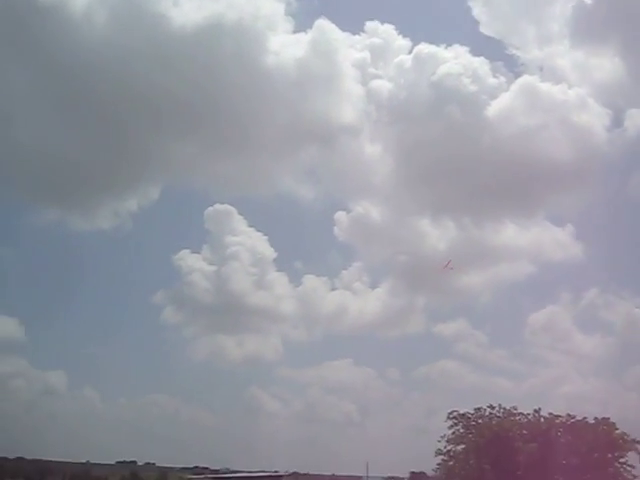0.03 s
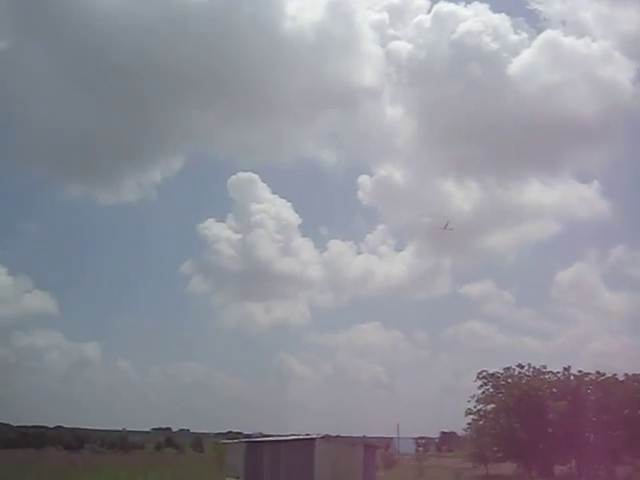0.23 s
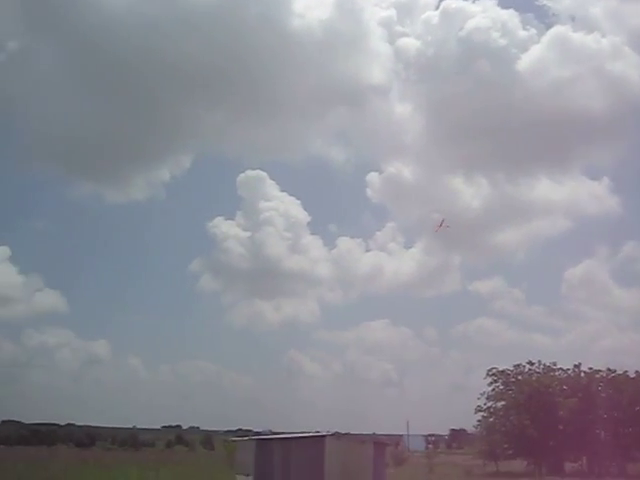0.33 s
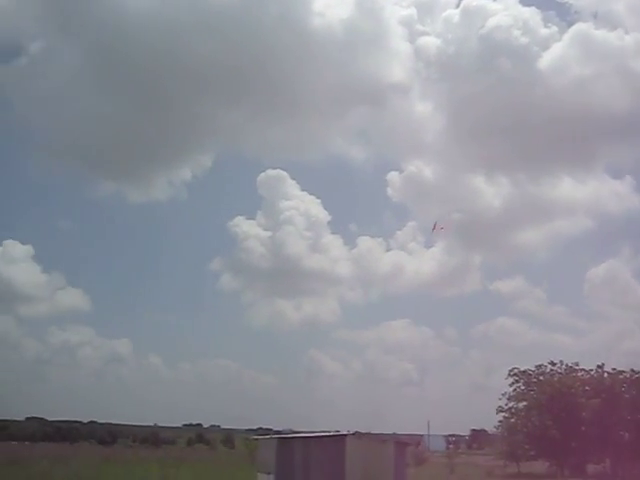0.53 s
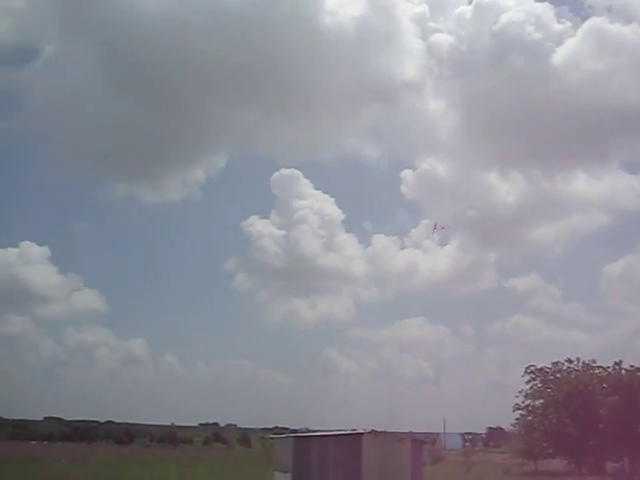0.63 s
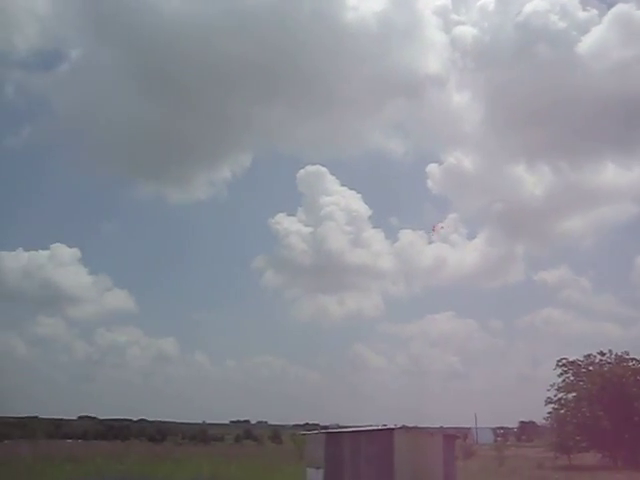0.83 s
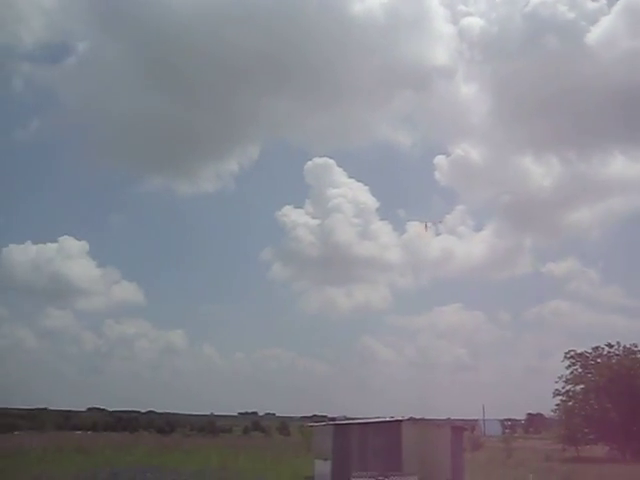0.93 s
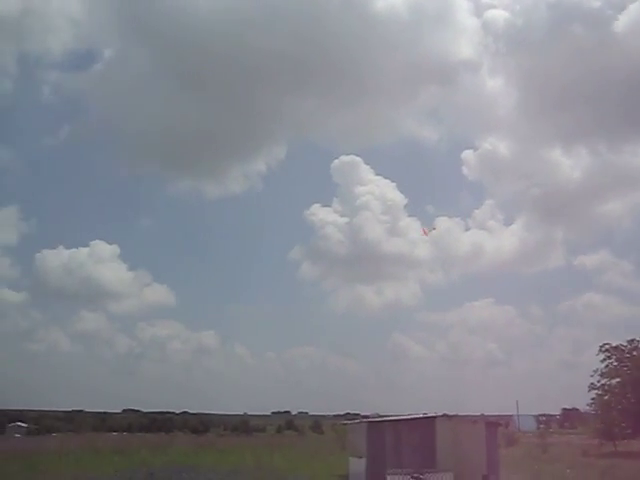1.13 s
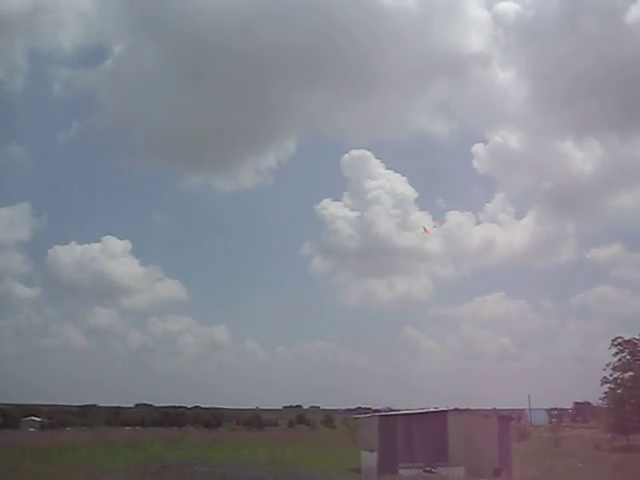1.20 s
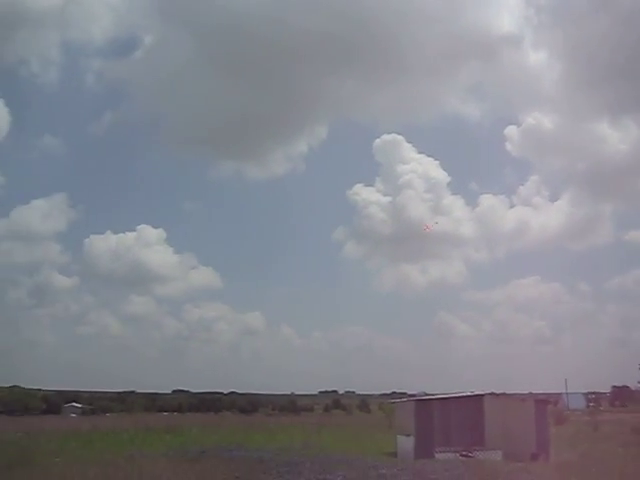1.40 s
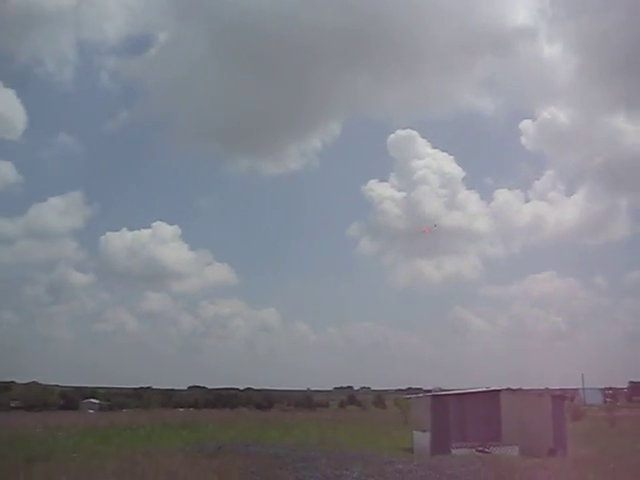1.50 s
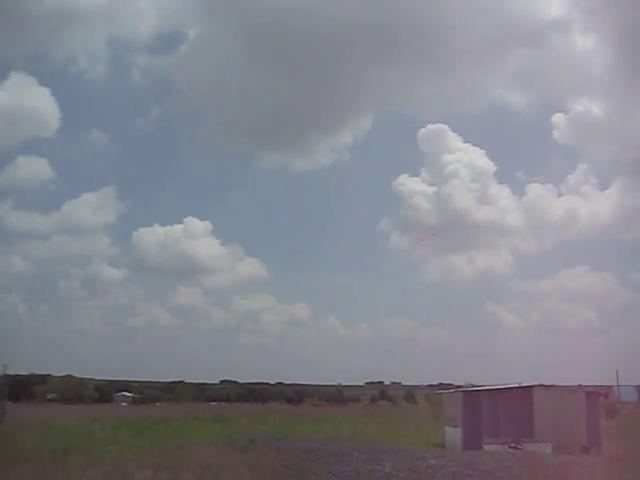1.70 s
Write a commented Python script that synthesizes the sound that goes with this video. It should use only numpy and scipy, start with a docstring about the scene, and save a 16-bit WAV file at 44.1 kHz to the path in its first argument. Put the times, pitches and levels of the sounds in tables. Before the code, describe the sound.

Repeated buzzy bird chirps over wind buffeting, a faint insect rasp and hiss.

```python
"""Songbird in a windy field

A songbird gives six buzzy trills that end in an upward flick, then two clear slurs (sliding notes),
each followed by a pip. An insect scrapes its file of tiny teeth in the grass and fades. Eddies, small
swirls of wind, thump on the microphone, over a steady hiss and a thin electronic whine."""
import sys
import numpy as np
from scipy import signal
from scipy.fft import rfft, irfft
from scipy.io import wavfile
from scipy.ndimage import uniform_filter1d

SR = 44100
rng = np.random.default_rng(int(sys.argv[2]) if len(sys.argv) > 2 else 0)


def dump(signal):
    """Clip the signal to [-1, 1] and save it as 16-bit WAV at the path in sys.argv[1]."""
    limited = np.clip(np.atleast_2d(signal).T, -1, 1)
    pcm = np.round(limited * 32767).astype(np.int16)
    wavfile.write(sys.argv[1], SR, pcm)


N = 77175
T = np.arange(N) / SR


def from_db(db):
    """Turn decibels into a number to multiply by."""
    return 10 ** (np.asarray(db) / 20)


def unit_power(x):
    """Scale a signal to an average power of 1."""
    return x / np.sqrt(np.mean(x ** 2) + 1e-20)


def colour(x, spectrum):
    """Shape the lows and highs with (f/Hz, level/dB) points, then scale to a power of 1."""
    hz, db = np.transpose(spectrum)
    f = np.arange(N // 2 + 1) * SR / N
    gain = from_db(np.interp(np.log(f + 1), np.log(hz), db))
    return unit_power(irfft(rfft(x) * gain, N))


def drift(per_s):
    """A random wander around zero that heads for a new value per_s times a second."""
    points = rng.standard_normal(2000)
    return np.interp(T * per_s, np.arange(len(points)), points)


def bell_curve(x):
    """A smooth bump, highest at x = 0."""
    return np.exp(-.5 * x ** 2)


def hiss():
    """Steady noise, strongest in the bass."""
    # tone of the hiss: f/Hz, level/dB
    spectrum = [(30, 15), (150, 4.5), (400, 5.5), (1000, 1.5), (1700, 0), (3000, -3), (5000, -6.5),
                (7600, -9), (8500, -9), (10000, -10), (11500, -14), (14000, -18), (15800, -11),
                (16400, -57)]
    return from_db(-45) * colour(rng.standard_normal(N), spectrum)


def rustles():
    """Short, soft puffs of noise."""
    # one row per rustle: t/s, width/s, centre f/Hz, level/dB
    puffs = [(0.047, 0.013, 1070, -45), (0.048, 0.0035, 1800, -42), (1.45, 0.015, 5400, -53.5)]
    out = np.zeros(N)
    for t, width, hz, db in puffs:
        band = colour(rng.standard_normal(N), [(hz / 2, -30), (hz, 0), (hz * 2, -30), (hz * 3, -60)])
        out += from_db(db) * band * bell_curve((T - t) / width)
    return out


def electronic_whine(hz=7570, restarts_per_s=30):
    """The electronics add a thin tone and its octave, which keep restarting."""
    phase = 2 * np.pi * hz * (T % (1 / restarts_per_s))
    return np.sqrt(2) * (from_db(-54.5) * np.sin(phase) + from_db(-58) * np.sin(2 * phase))


def insect(first_chirp_s=.02634, stroke_gap_s=.0072, stroke_width_s=.0017, teeth_per_s=4500):
    """Each chirp is three strokes of a file whose tiny teeth click."""
    # course of the chirping: t/s, chirp rate/Hz, level/dB
    chirping = [(0, 30, -47), (.05, 34, -44), (.13, 33.3, -39.5), (.28, 32, -41.5), (.55, 33.1, -44),
                (.75, 35, -45), (.83, 35, -52), (1.2, 28, -54.5), (1.75, 24, -54)]
    # tone of the rasp: f/Hz, level/dB
    rasp = [(2500, 0), (3300, 2), (4500, -0.5), (6500, 0.5), (7700, -0.5), (8500, 5.5), (10000, 1),
            (12000, -6.5), (16500, -9)]
    t, rates, db = np.transpose(chirping)
    rate = np.interp(T, t, rates)
    chirp_count = np.cumsum(rate) / SR - first_chirp_s * rate[0]
    strokes = np.zeros(N)
    for k in range(3):
        from_stroke_s = ((chirp_count - k * stroke_gap_s * rate + .5) % 1 - .5) / rate
        strokes += bell_curve(from_stroke_s / stroke_width_s)
    clicks = rng.choice([-1, 1], N) * (rng.random(N) < teeth_per_s / SR)
    return colour(clicks, rasp) * strokes * from_db(np.interp(T, t, db) + 1.7 * drift(140))


def pressure_pulses(eddies, edge_db, edge_ratio=1.85, width_cycles=.37):
    """Each eddy (t/s, level/dB, f/Hz) hits the microphone as a swing of pressure with a steeper edge."""
    out = np.zeros(N)
    for (t, db, hz), phase in zip(eddies, rng.uniform(0, 2 * np.pi, len(eddies))):
        near = slice(max(int(t * SR) - 1500, 0), max(int(t * SR) + 1500, 0))
        for part_hz, part_db in ((hz, db), (hz * edge_ratio, db + edge_db)):
            cycles = (T[near] - t) * part_hz
            swing = np.cos(2 * np.pi * cycles + phase)
            out[near] += from_db(part_db) * bell_curve(cycles / width_cycles) * swing
    return out


def wind(eddies_per_s=140, eddy_hz=168.3, octaves_per_db=.032, top_hz=1056):
    """Eddies pop louder and higher as the gust grows, over a rumble; some hit hard."""
    # wind strength at the microphone: t/s, level/dB
    gusts = [(0, -56), (.12, -42.5), (.21, -34.5), (.29, -29), (.48, -23), (.54, -28.5), (.66, -27),
             (.79, -28), (.88, -24), (.96, -33), (1.02, -22), (1.07, -38.5), (1.12, -38.5), (1.17, -23.5),
             (1.27, -40.5), (1.34, -26), (1.44, -33), (1.52, -36), (1.60, -50), (1.75, -88)]
    # tone of the rumble: f/Hz, level/dB
    rumble_tone = [(20, -16), (45, 1), (90, 0.5), (150, 0.5), (300, -24), (900, -33)]
    # hard hits of air: t/s, level/dB, f/Hz
    hits = [(.245, -20.5, 352), (0.248, -18.5, 520), (.285, -12.5, 306), (.298, -15, 200), (.371, -16, 178),
            (.433, -15.5, 244), (0.466, -16, 190), (0.479, -12.5, 303), (.494, -19.5, 234),
            (0.599, -18, 334.5), (0.613, -16.5, 196.7), (0.641, -13, 167), (0.697, -11, 229),
            (.747, -12.5, 348), (.755, -14, 132), (.788, -22.5, 340), (.844, -16.5, 410),
            (0.852, -10.5, 290), (.856, -9.5, 282), (.880, -10, 330), (0.885, -9, 268), (.901, -15.5, 195),
            (1.004, -7, 398), (1.006, -16.5, 472), (1.101, -21.5, 127), (1.102, -10, 460),
            (1.164, -18, 398), (1.180, -18, 240.5), (1.306, -11, 311), (1.316, -16, 307), (1.329, -16, 280),
            (1.390, -17, 220), (1.468, -22, 197)]
    gust_db = np.interp(T, *np.transpose(gusts))
    swing_db = gust_db - gust_db.mean()
    rumble_db = gust_db.mean() - 5 + .71 * swing_db   # follows the gust only partly
    rumble = from_db(rumble_db) * colour(rng.standard_normal(N), rumble_tone)
    wakes = [(t + .0042, db - 13.5, hz * .413) for t, db, hz in hits]   # a slow swing behind each hit
    thumps = pressure_pulses(hits + wakes, edge_db=-12.5)
    jitter, size, pitch = rng.standard_normal((int(eddies_per_s * N / SR), 3)).T
    times = (np.arange(len(size)) + .354 * jitter) / eddies_per_s
    octaves = .39 * np.clip(pitch, -2, 1.4) + octaves_per_db * np.interp(times, T, swing_db)
    eddies = np.transpose([times, 3 * np.clip(size, -2, 1), eddy_hz * 2 ** octaves])
    pops = from_db(gust_db - .5) * unit_power(pressure_pulses(eddies, edge_db=-9.5))
    return signal.sosfilt(signal.butter(4, top_hz, fs=SR, output="sos"), pops + rumble + thumps)


def field_echo(x, level_db=-25, fade_s=.25):
    """Ground and bushes scatter a little of the sound back."""
    tail = rng.standard_normal(N) * from_db(-60 * T / fade_s)
    return from_db(level_db) * signal.fftconvolve(x, tail / np.sqrt(np.sum(tail ** 2)))[:N]


def whistle(hz, db, start, end):
    """A pure tone that follows pitch and level curves, both smoothed over about 4 ms."""
    loudness = uniform_filter1d(((T > start) & (T < end)) * from_db(db), 180)
    phase = 2 * np.pi * np.cumsum(uniform_filter1d(hz, 180)) / SR
    return np.sqrt(2) * loudness * np.sin(phase)


def faint_whistles():
    """Short, quiet glides behind the main song."""
    # one row per whistle: start t/s, length/s, first f/Hz, last f/Hz, level/dB
    glides = [(0.704, 0.034, 3760, 3500, -53.5), (0.801, .058, 3800, 3670, -54.5),
              (1.19, .035, 3600, 3000, -68), (1.3, 0.049, 2800, 3130, -52), (1.47, 0.0196, 3180, 2800, -52),
              (1.582, 0.048, 2880, 3180, -59)]
    out = np.zeros(N)
    for start, length, first_hz, last_hz, db in glides:
        end = start + length
        hz = np.interp(T, [start, end], [first_hz, last_hz])
        fade_db = np.interp(T, [start, start + length / 2, end], [-6, 0, -6])
        out += whistle(hz, db + fade_db, start, end)
    return out


def clear_notes(notes, shape):
    """Whistled notes that share one shape of pitch and level."""
    share, hz, db = np.transpose(shape)
    out = np.zeros(N)
    for start, length, level_db in notes:
        times = start + length * share
        pitch = np.interp(T, times, hz) + 10 * drift(200)
        out += whistle(pitch, level_db + np.interp(T, times, db), start, start + length)
    return out


def pips():
    """The bird whistles two tiny rising notes."""
    # one row per pip: start t/s, length/s, level/dB
    notes = [(1.479, 0.023, -35), (1.719, 0.022, -37.5)]
    # course of a pip: share of its length, f/Hz, level/dB
    shape = [(0, 2230, -12), (.25, 2374, -3), (0.649, 2510, -1.5), (1, 2447, -13)]
    return clear_notes(notes, shape)


def slurs():
    """The bird whistles two notes that slide up, then down."""
    # one row per slur: start t/s, length/s, level/dB
    notes = [(1.325, 0.099, -32), (1.551, .092, -31.5)]
    # course of a slur: share of its length, f/Hz, level/dB
    shape = [(0, 2300, -13), (.08, 2666, -7.5), (.18, 2783, -3.5), (.28, 2694, 0), (.39, 2453, -1.5),
             (.52, 2310, -7.5), (0.799, 2228, -19.5), (1, 2170, -20)]
    return clear_notes(notes, shape)


def trills(warble_hz=73, sag_hz=124.7, flick_drop_hz=332, attack_s=.007):
    """The bird warbles fast, with a weaker second voice below, then dips in pitch and flicks up loudly."""
    # one row per call: start t/s, trill end t/s, end t/s, onset f/Hz, trill f/Hz, dip f/Hz, flick f/Hz,
    # trill level/dB, dip level/dB, flick level/dB, warble depth/Hz, second voice against the trill/dB
    calls = [(0.013, 0.071, .128, 2480, 2570, 2130, 2320, -48.5, -40, -37, 100, -5.5),
             (0.177, 0.267, 0.34, 2560, 2633, 2094, 2410, -44.5, -42, -32.5, 170, -8),
             (0.391, 0.479, .540, 2607, 2700, 2173, 2390, -45.5, -38.5, -32.5, 100, -8),
             (0.596, .688, .770, 2500, 2633, 1920, 2220, -43.5, -55, -40.5, 181, -8),
             (0.824, 0.933, .995, 2420, 2524, 2060, 2340, -46, -50, -34.5, 128, -12),
             (1.076, 1.172, 1.243, 2670, 2544, 2040, 2250, -45, -53, -41.5, 115, -15)]
    out = np.zeros(N)
    for (start, trill_end, end, onset_hz, trill_hz, dip_hz, flick_hz,
         trill_db, dip_db, flick_db, depth_hz, second_db) in calls:
        crest, dip, flick = (start + trill_end) / 2, end - .034, end - .0096
        hz = np.interp(T, [start, crest, trill_end, dip - .007, dip + .0043, flick, end],
                       [onset_hz, trill_hz, trill_hz - sag_hz, dip_hz + 30, dip_hz + 20,
                        flick_hz, flick_hz - flick_drop_hz])
        db = np.interp(T, [start, start + attack_s, crest, trill_end, dip, flick - .007, flick, end],
                       [trill_db - 12, trill_db - 4, trill_db, trill_db, dip_db,
                        flick_db, flick_db, flick_db - 14])
        buzz = np.interp(T, [trill_end, dip - .007], [1, 0])   # dies away before the dip
        phase = 2 * np.pi * np.cumsum(warble_hz * (1 + .102 * drift(60.4))) / SR
        warble = buzz * (np.sin(phase) - .35 * np.sin(2 * phase))   # rises slowly, drops fast
        main_hz = hz + depth_hz * warble + 35 * buzz * drift(250)
        main_db = db - 1.5 * warble + (.75 + 1.6 * buzz) * drift(200)
        out += whistle(main_hz, main_db, start, end)
        lower_hz = np.interp(T, [start, trill_end], [2363, 1972]) + 110 * warble + 50 * drift(230)
        lower_db = trill_db + second_db + 3 * warble + 2.2 * drift(180)
        out += whistle(lower_hz, lower_db, start + attack_s, trill_end + .0072)
    return out


def scene():
    """Birdsong, insect, background and wind meet at one microphone."""
    song = trills() + slurs() + pips() + faint_whistles()
    return (song + field_echo(song) + insect() + hiss() + rustles() + electronic_whine() + wind())[None]


def record(dry, bass_hz=32, top_hz=17200):
    """The microphone loses the deepest bass, and the highest treble is cut steeply."""
    thin = signal.sosfilt(signal.butter(2, bass_hz, "high", fs=SR, output="sos"), dry)
    return signal.sosfilt(signal.ellip(10, .1, 90, top_hz, fs=SR, output="sos"), thin)


dry = scene()
out = record(dry)
dump(out)
```